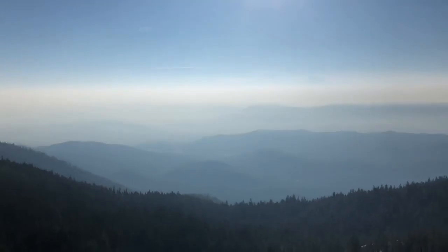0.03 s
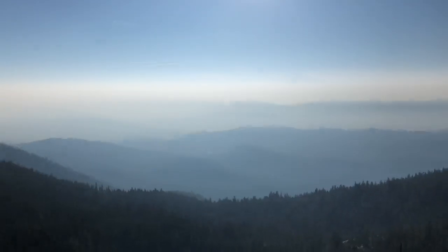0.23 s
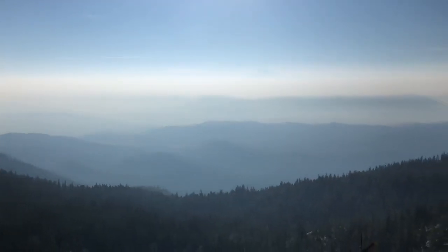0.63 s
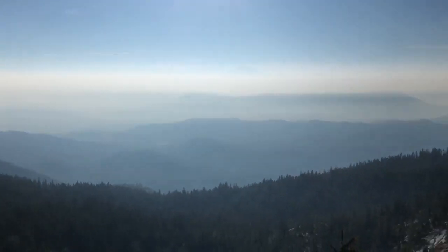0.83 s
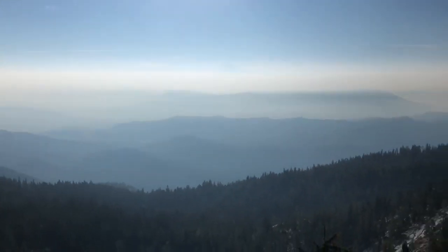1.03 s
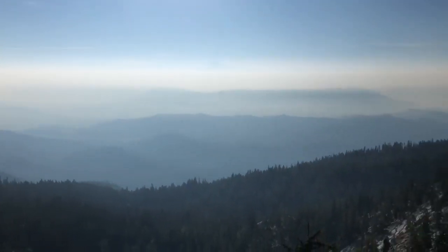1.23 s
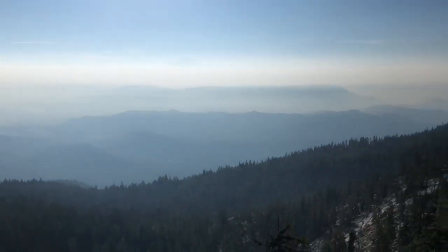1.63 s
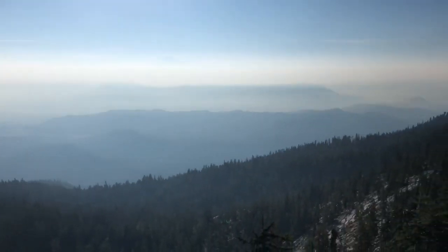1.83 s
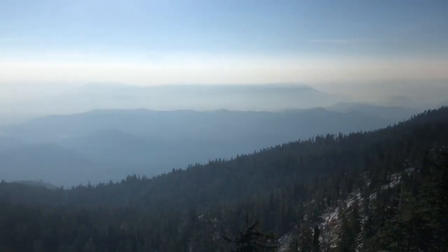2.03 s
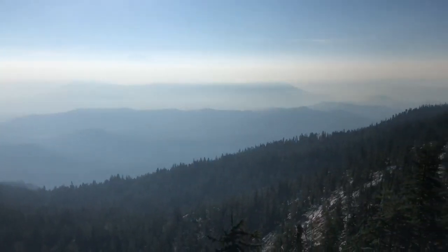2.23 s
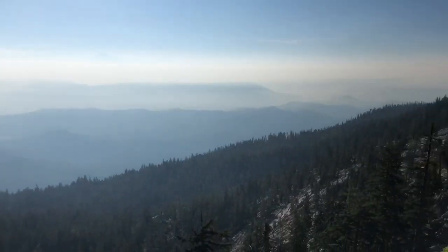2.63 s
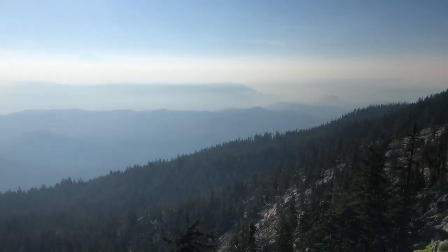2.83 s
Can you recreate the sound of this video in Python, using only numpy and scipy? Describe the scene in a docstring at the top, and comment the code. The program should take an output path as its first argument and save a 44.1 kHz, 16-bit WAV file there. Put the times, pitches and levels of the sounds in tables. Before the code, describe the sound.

Wind buffeting the microphone in low gusts, with a sharp click and faint bird chirps.

```python
"""A quiet mountain overlook. Wind buffets the microphone in low, lumpy gusts, one of them a heavy thud.
Close by come a sharp click and two softer ones, perhaps a pole or boot on stones: each cracks, rings
and scatters off the rocks, among dull knocks and faint scuffs of grit. A small bird whistles four
chirps that rise and fall and linger among the trees. Far notes and a soft hiss of air lie behind."""
import sys
import numpy as np
from scipy import signal
from scipy.fft import rfft, irfft, next_fast_len
from scipy.io import wavfile
from scipy.ndimage import uniform_filter1d

SR = 44100
rng = np.random.default_rng(int(sys.argv[2]) if len(sys.argv) > 2 else 0)


def master_out(mix):
    """Clip the mix to full scale and print it as 16-bit PCM to the path in sys.argv[1]."""
    frames = np.transpose(np.atleast_2d(mix))
    ceiling = np.clip(frames, -1, 1)
    pcm = np.round(ceiling * 32767).astype(np.int16)
    wavfile.write(sys.argv[1], SR, pcm)


N = 132300
TIME = np.arange(N) / SR


# How strong the wind is from moment to moment: t/s, level/dB
GUST_LEVELS = [(0, -55), (.15, -52.5), (.25, -44.5), (.39, -54), (.428, -35), (.45, -35), (.515, -30.5),
               (.55, -45.5), (.6, -51), (.655, -41), (.73, -51), (.84, -50.5), (.93, -62.5), (1.18, -49.5),
               (1.34, -57.5), (1.47, -41.5), (1.61, -61), (1.77, -39.5), (1.84, -49.5), (1.91, -50.5),
               (1.98, -50), (2.07, -48), (2.17, -47.5), (2.235, -59), (2.3, -38.5), (2.35, -45),
               (2.44, -47.5), (2.53, -51), (2.66, -54), (2.83, -51), (2.87, -56.5), (2.91, -86), (3, -89)]
# The deep tone of the wind: f/Hz, level/dB
RUMBLE_TONE = [(15, -37.5), (30, -12), (52, -1), (100, -1), (135, -4), (200, -15), (300, -25), (450, -35),
               (800, -56), (2000, -90)]

def gusts(eddy_s=0.081):
    """Swirling air pushes on the microphone: a low rumble that swells with each gust."""
    rumble = colour(rng.standard_normal(N), RUMBLE_TONE)
    window = int(eddy_s * SR)
    power = uniform_filter1d(uniform_filter1d(rumble ** 2, window), window)
    even_rumble = rumble / np.sqrt(power + 1e-20)
    return amp(np.interp(TIME, *np.transpose(GUST_LEVELS))) * even_rumble


# Single swirls of air hitting the microphone: t/s, level/dB, f/Hz, rise/s
WIND_BUMPS = [(0.215, -44.5, 166, 0.007), (.237, -45, 206, 0.0066), (0.261, -39, 100, .008),
              (.29, -44.5, 112, 0.013), (0.446, -26.5, 235, 0.01), (.455, -23, 141.7, 0.0096),
              (.47, -25, 177.6, 0.0052), (0.505, -28, 112.5, .016), (.509, -36, 218, 0.012),
              (0.567, -34.5, 107, 0.0092), (0.849, -49.5, 170, 0.0076), (.647, -40, 145, 0.0139),
              (.679, -48, 170, 0.016), (1.127, -46, 177, 0.0092), (1.167, -45, 151, 0.0044),
              (1.192, -39.5, 203, 0.0034), (1.266, -47, 174, 0.0095), (1.446, -41, 97, 0.0054),
              (1.494, -32.5, 116, 0.003), (1.724, -45.5, 199, 0.012), (1.77, -32, 170, 0.0039),
              (1.8, -46, 175, 0.0051), (1.857, -43.5, 210, 0.0053), (1.87, -34, 155, 0.0052),
              (1.915, -40, 184, 0.0042), (2.055, -33, 162, 0.0057), (2.076, -32.5, 76.5, 0.009),
              (2.152, -38, 160, 0.0036), (2.288, -37.5, 207, 0.0068), (2.315, -34.5, 75, 0.0099),
              (2.339, -37, 185, 0.0062), (2.385, -27, 208, 0.0023), (2.412, -40, 173, 0.0052),
              (2.436, -43.5, 141, .007), (2.599, -42.5, 199, .004), (2.609, -38, 85.6, .008),
              (2.732, -36, 227, 0.0028), (2.739, -36, 88.5, 0.0078)]

def buffets(wobble_oct=0.24, wobble_hz=83.3, sag_oct=0.16):
    """Each swirl makes a low bump whose pitch wobbles and sinks as it passes."""
    wobble = unit(signal.lfilter(*signal.butter(2, wobble_hz, fs=SR), rng.standard_normal(N)))
    out = np.zeros(N)
    for at, db, hz, rise in WIND_BUMPS:
        sag = sag_oct * np.clip((TIME - at) / rise, -2, 2)
        pitch = hz * 2 ** (wobble_oct * wobble - sag)
        phase = 2 * np.pi * np.cumsum(pitch) / SR
        phase += 2 * np.pi * rng.random() - np.interp(at, TIME, phase)
        tone = np.cos(phase) + 0.097 * np.cos(2 * phase)  # plus a little of the octave above
        out += amp(db) * hump(at, rise, fall=1.72 * rise) * tone
    low_band = signal.butter(2, [37.6, 451], "band", fs=SR, output="sos")
    return signal.sosfiltfilt(low_band, out)


# Hard contacts, bunched into clicks: t/s, level/dB, ring/dB, low boost/dB, treble boost/dB
CONTACTS = [(.3543, -25, -8, 11, 13), (0.3563, -14, -3, 1.5, -0.5), (0.3592, -33.5, -6, 8, -3),
            (.3644, -27, -14, 5, -8), (0.391, -32.5, -11, 5, -10), (0.9091, -43, -6, 11, -19),
            (0.913, -38, -16, -2, -7), (0.9225, -36, 0, -1, -4), (1.878, -46, -13, 7, -15),
            (2.4552, -33.5, -24, 17.5, -15), (2.4607, -39, -14, -13, -8), (2.4695, -44, -15, 6, -11)]
# The notes a contact rings with: f/Hz, level/dB, time to fade by 60 dB/s
RING_NOTES = [(1620, -15, .035), (2805, -8, .03), (3350, 0, .022), (3850, 0, .022), (4630, 1, .024),
              (5100, -4, .018), (5400, -4, .018), (5916, -8, .025), (7050, -1, .018), (9238, -10, .022),
              (10300, -7, .02), (10800, -9, .018), (12400, -5, .015)]
# The tone of the crack itself: f/Hz, level/dB
CRACK_TONE = [(200, -27), (900, -20.5), (1500, -11.5), (2800, -3.5), (3350, -3.5), (3600, -12.5),
              (3900, -1), (4220, -12), (4600, 2), (5700, 1), (6200, -4), (7100, -2), (8300, -10),
              (11600, -11), (12500, -7.5), (15000, -16.5), (16000, -35.5)]
# The tone of the echo off the rocks: f/Hz, level/dB
ROCK_ECHO_TONE = [(300, -12), (1500, -12.5), (3500, -2), (6000, -7.5), (9000, -14.5), (12000, -29),
                  (16000, -15)]

def clicks(echo_db=-14, echo_s=0.34):
    """Each contact cracks and rings briefly; the rocks around scatter the sound."""
    out, t = np.zeros(N), TIME[:SR // 2]
    for at, db, ring_db, low_db, treble_db in CONTACTS:
        ring = np.zeros(len(t))
        for hz, note_db, fade_s in RING_NOTES:
            ring += amp(note_db) * fade(fade_s, len(t)) * np.sin(2 * np.pi * (hz * t + rng.random()))
        crack = colour(snap(fade_s=0.011, size=len(t)), CRACK_TONE)
        direct = normed(crack) + amp(ring_db) * normed(ring)
        echo = colour(burst(echo_s, len(t)), ROCK_ECHO_TONE)
        hit = normed(direct) + amp(echo_db) * normed(echo)
        hit = colour(hit, [(1460, low_db), (4000, 0), (2360, 0), (12900, treble_db)])
        add(out, at, amp(db) * normed(hit))
    return out


# Dull knocks, perhaps loose stones: t/s, level/dB, f/Hz
STONE_TAPS = [(.3565, -51, 483), (.405, -53, 1550), (.501, -56.5, 1390), (.656, -51, 740),
              (1.001, -61, 1340), (1.742, -61, 1220), (1.880, -52, 520), (2.969, -65, 1450),
              (2.975, -58, 860)]

def knocks(half_width_oct=0.33):
    """A tapped stone stops ringing so fast that it has only a rough pitch."""
    out = np.zeros(N)
    for at, db, hz in STONE_TAPS:
        band = hz * 2 ** (half_width_oct * np.array([-1, 1]))
        tap = signal.lfilter(*signal.butter(2, band, "band", fs=SR), burst(fade_s=0.017, size=4096))
        add(out, at, amp(db) * tap / abs(tap).max())
    return out


# Scuffs on grit: t/s at the peak, rise/s, fall/s, level/dB, brightness/dB per octave
GRIT_SCUFFS = [(0.403, 0.0083, 0.029, -62.5, 3), (.46, 0.021, 0.038, -67, -1.5),
               (.51, 0.032, 0.029, -64.5, 1), (0.92, 0.013, 0.016, -64.5, 4), (.97, 0.058, 0.13, -73, 1),
               (1.501, 0.052, 0.052, -71.5, -2), (2.06, 0.057, 0.023, -67, -2.5),
               (2.467, 0.013, 0.022, -68.5, 6), (2.52, 0.03, .025, -72, 3), (2.735, .012, 0.012, -76.5, 5)]
# The tone of crunching grit: f/Hz, level/dB
GRIT_TONE = [(300, -6), (900, 3.5), (1800, 5), (3500, -1), (5800, -8.5), (9000, -18.5), (12000, -24),
             (16000, -42)]

def scuffs(grains_per_s=4000, spread_db=3):
    """Grit crunches as a swell of tiny grains, each ticking at a random moment."""
    out = np.zeros(N)
    for at, rise, fall, db, tilt in GRIT_SCUFFS:
        sizes = amp(spread_db * np.minimum(rng.exponential(1, N), 3))
        signs = rng.choice([-1, 1], N)
        grains = sizes * signs * (rng.random(N) < grains_per_s / SR)
        out += amp(db) * hump(at, rise, fall) * unit(colour(grains, GRIT_TONE, tilt))
    return out


# The small bird's chirps, each at its highest point: t/s, f/Hz, level/dB
BIRD_CHIRPS = [(.164, 2866, -56.5), (1.906, 2803, -56), (2.072, 2825, -58.5), (2.259, 2883, -56)]

def bird(climb_hz=1200, drop_hz=673, echo_db=-11):
    """Each whistle arches up and settles on a soft lower note; the trees echo it."""
    song = np.zeros(N)
    for at, top_hz, db in BIRD_CHIRPS:
        arch_hz = 384 * ((TIME - at) / 0.013) ** 2
        limit_hz = np.where(TIME < at, climb_hz, drop_hz)
        pitch = top_hz - limit_hz * np.tanh(arch_hz / limit_hz)  # levels off on both sides
        end_note = amp(-18) * hump(at + 0.03, rise=0.0068, fall=0.0068)
        level = hump(at, rise=0.013, fall=0.015) + end_note
        song += amp(db) * level * np.sin(2 * np.pi * np.cumsum(pitch) / SR)
    build_up = 1 - np.exp(-TIME[:SR] / 0.015)
    forest = normed(burst(fade_s=1, size=SR) * build_up)
    return song + amp(echo_db) * signal.fftconvolve(song, forest)[:N]


# Far-off bird notes: t/s at the peak, rise and fall/s, f/Hz, pitch spread/Hz, level/dB
FAR_CALLS = [(.01, .04, 2854, 60, -78), (0.17, 0.06, 7150, 260, -82.5), (0.705, 0.17, 3600, 220, -86),
             (1.13, 0.11, 3650, 260, -84), (1.42, 0.095, 2530, 139, -81), (2.62, 0.11, 2600, 69.5, -84.5)]

def far_birds():
    """The forest smears distant notes into soft swells of noise around one pitch."""
    out = np.zeros(N)
    freqs = np.fft.rfftfreq(N, 1 / SR)
    for at, swell_s, hz, spread_hz, db in FAR_CALLS:
        band = np.exp(-((freqs - hz) / spread_hz) ** 2)
        smear = irfft(rfft(rng.standard_normal(N)) * band, N)
        out += amp(db) * hump(at, swell_s, swell_s) * unit(smear)
    return out


# The tone of the distant air: f/Hz, level/dB
AIR_TONE = [(30, 4), (200, 6.5), (400, 4), (700, -1.5), (1300, -7), (2500, -11), (5000, -14), (9000, -17.5),
            (13000, -19.5), (15300, -17), (16000, -20.5)]

def air(level_db=-69):
    """Far-off air makes a steady, faint hiss."""
    return amp(level_db) * unit(colour(rng.standard_normal(N), AIR_TONE))


def amp(db):
    """Turns decibels into a number to multiply by."""
    return 10 ** (np.asarray(db) / 20)


def unit(x):
    """Scales a sound to an average power of 1."""
    return x / np.sqrt(np.mean(x ** 2) + 1e-20)


def normed(x):
    """Scales a sound to a total energy of 1."""
    return x / np.linalg.norm(x)


def add(mix, at, sound):
    """Mixes a sound in at a time in seconds."""
    part = mix[max(round(at * SR), 0):][:len(sound)]
    part += sound[:len(part)]


def hump(at, rise, fall):
    """A smooth swell that peaks at the given time."""
    return np.exp(-((TIME - at) / np.where(TIME < at, rise, fall)) ** 2)


def fade(fade_s, size):
    """A level that falls by 60 dB in fade_s seconds."""
    return 1000 ** (-np.arange(size) / SR / fade_s)


def burst(fade_s, size):
    """Noise that dies away."""
    return rng.standard_normal(size) * fade(fade_s, size)


def snap(fade_s, size):
    """A dense, fast-dying crack, about equally strong from low to high."""
    level = fade(fade_s, size)
    crack = burst(fade_s, size)
    for _ in range(6):  # even out the tone, then squash the peaks and fade again
        spectrum = rfft(crack)
        even = unit(irfft(spectrum / (abs(spectrum) + 1e-12), size))
        crack = np.tanh(even / (unit(level) + 1e-9)) * level
    return crack


def colour(x, points, tilt_db=0):
    """Shapes a sound's tone through (f/Hz, level/dB) points, tilted by tilt_db per octave about 4 kHz."""
    size = 2 * next_fast_len(len(x))
    octave = np.log2(abs(np.fft.fftfreq(size, 1 / SR)) + 1)
    hz, db = np.transpose(points)
    lean = np.clip(octave - np.log2(4000), -3, 3)
    log_gain = np.log(amp(np.interp(octave, np.log2(hz), db) + tilt_db * lean))
    response = np.exp(np.conj(signal.hilbert(log_gain)))  # rings after a hit, never before it
    return np.fft.ifft(np.fft.fft(x, size) * response).real[:len(x)]


def scene():
    """All the sounds meet at one microphone."""
    return (gusts() + buffets() + clicks() + knocks() + scuffs() + bird() + far_birds() + air())[None]


def record(dry, top_hz=15750):
    """Cuts away the very highest treble."""
    low_pass = signal.firwin(511, top_hz, window=("kaiser", 9), fs=SR)
    return signal.oaconvolve(dry, low_pass[None], "same")


dry = scene()
out = record(dry)
master_out(out)
```